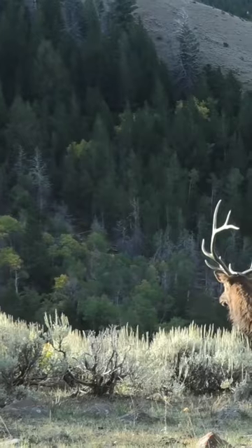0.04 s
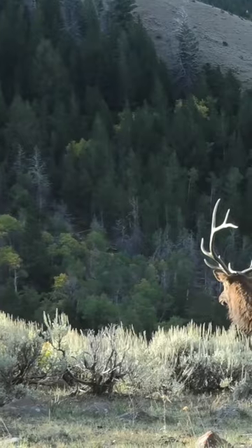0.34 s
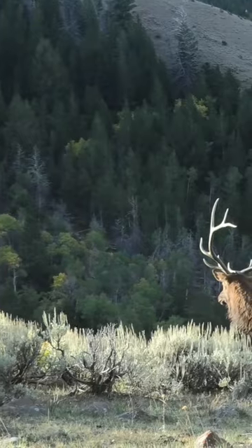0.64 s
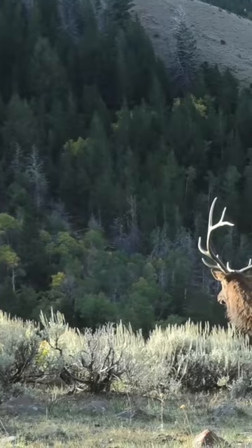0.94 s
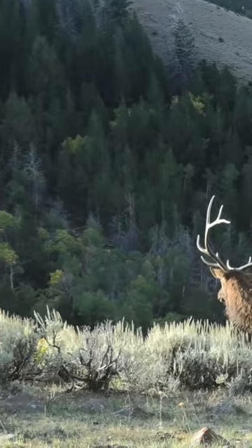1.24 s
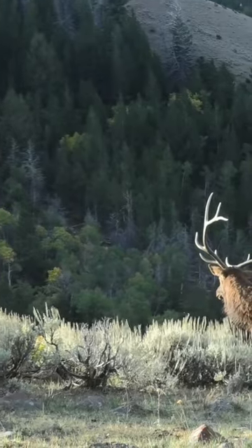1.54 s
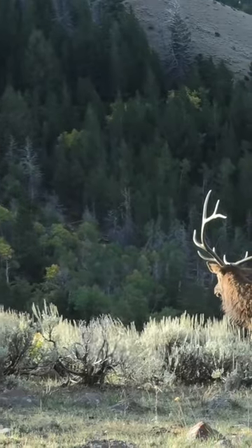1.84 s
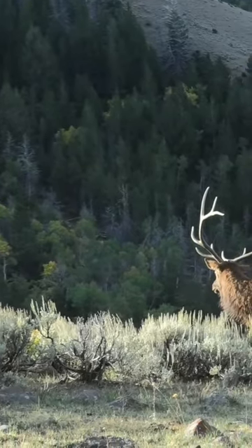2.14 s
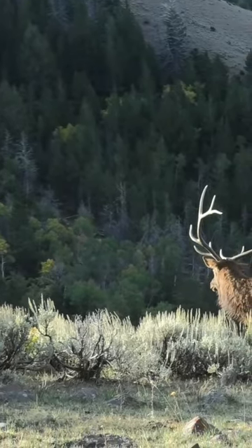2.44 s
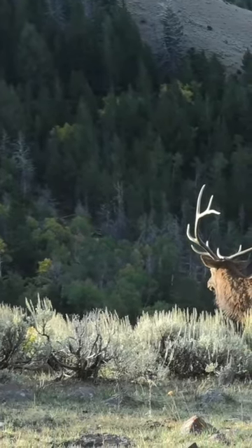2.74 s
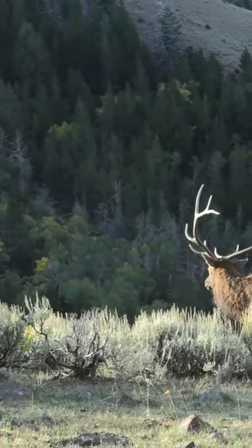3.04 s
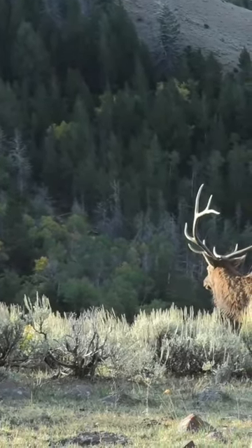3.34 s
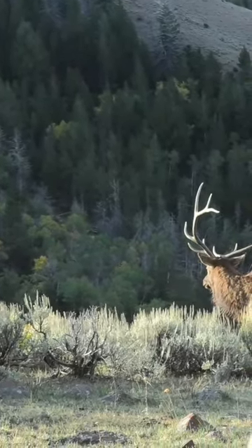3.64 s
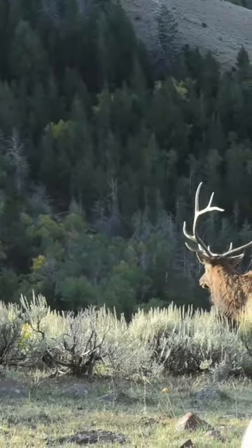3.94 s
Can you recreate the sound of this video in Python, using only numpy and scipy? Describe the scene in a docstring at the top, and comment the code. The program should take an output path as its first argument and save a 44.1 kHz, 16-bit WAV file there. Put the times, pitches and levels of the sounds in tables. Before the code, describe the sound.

Elk bugle across an open hillside, with thin, wavering, distant whistles for the first 2 seconds. At about 2.2 seconds a nearer bull gives a short falling honk. Three louder rising whistles follow at about 2.8, 3.3 and 3.8 seconds, each breaking into a breathy grunt and echoing faintly. Wind rushes softly throughout, with low gusts buffeting the microphone harder from about 2 seconds.

```python
"""Thin bugles of far elk come first. Then a bull elk on an open hillside gives a two-voiced honk
and three rising whistles, nearly pure tones that each break into a grunt of breath in his throat.
The forested slope sends back faint echoes. All along, air rushes over the sagebrush
and gusts buffet the microphone more and more."""
import sys
import numpy as np
from scipy import signal
from scipy.fft import rfft, irfft, next_fast_len
from scipy.io import wavfile
from scipy.ndimage import uniform_filter1d, map_coordinates

SR = 44100
rng = np.random.default_rng(int(sys.argv[2]) if len(sys.argv) > 2 else 0)


def transcribe(signal):
    """Save signal, clipped to [-1, 1], as a 16-bit WAV file at the path in sys.argv[1]."""
    frames = np.atleast_2d(signal).T
    limited = np.clip(frames, -1, 1)
    pcm = np.round(limited * 32767).astype(np.int16)
    wavfile.write(sys.argv[1], SR, pcm)


N = 176400  # 4 seconds


def whistles():
    """A nearly pure tone climbs and swells with effort, then jumps down to a squeak."""
    # one curve per whistle (time [s], pitch [Hz], level [dB], octave overtone against the tone [dB])
    whistle_curves = [
        [(2.7, 1904, -66, -28), (2.745, 2060, -65, -29), (2.778, 2077, -52, -27), (2.802, 2105, -66, -3),
         (2.822, 2129, -49, -19), (2.848, 2155, -48, -13), (2.875, 2170, -43.5, -30), (2.925, 2144, -40, -31.5),
         (2.94, 2190, -50, -15)],
        [(3.26, 1850, -58, -22), (3.288, 1960, -71, -26.5), (3.31, 2070, -50, -39), (3.34, 2085, -44, -46),
         (3.372, 2117, -44, -33), (3.4, 2137, -41, -19.5), (3.427, 2087, -42, -35)],
        [(3.785, 1957, -75, -25), (3.815, 2010, -56, -28), (3.84, 2055, -52.5, -32), (3.875, 2085, -44, -32),
         (3.898, 2107, -41.5, -32), (3.912, 2100, -45, -32)],
    ]
    # third harmonic of each whistle at its loudest (level against the tone [dB])
    third_levels = [-37, -50, -48]
    # squeaks where the voice breaks (time [s], level [dB])
    squeaks = [(2.943, -50.5), (3.432, -43.5), (3.912, -44.5)]
    out = np.zeros(N)
    for rows, third_db in zip(whistle_curves, third_levels):
        hz, db, octave_db = curves(rows)
        level = amp(db + 0.5 * wobble(60)) * gate(rows[0][0], rows[-1][0], fade=0.006)
        phase = phase_of(hz, jitter=0.0021)
        octave = amp(octave_db + 1.6 * wobble(50)) * np.sin(2 * phase)
        third = amp(third_db) * level / level.max() * np.sin(3 * phase)
        out += level * (np.sin(phase) + octave + third)
    squeak_hz, fall_hz_per_s = 1889, 4100
    for peak, db in squeaks:
        hz = squeak_hz - fall_hz_per_s * np.clip(clock() - peak, -0.02, 0.02)
        out += amp(db) * swell(peak, 0.0052, 0.0052) * np.sin(phase_of(hz, jitter=0.0039))
    return np.sqrt(2) * out


def grunts():
    """Each is a rasp with two hoarse tones: one about an octave below the whistle, then a lower one."""
    # one grunt per whistle (peak time [s], rasp level [dB], pulse rate [Hz], tone level [dB])
    grunt_list = [(2.963, -50, 170, -51.5), (3.454, -49.5, 185, -59.5), (3.928, -53, 175, -60)]
    out = np.zeros(N)
    for peak, rasp_db, pulse_hz, tone_db in grunt_list:
        upper = swell(peak - 0.006, 0.027, 0.027) * np.sin(phase_of(hz=1030, jitter=0.023))
        lower = swell(peak + 0.013, 0.027, 0.026) * np.sin(phase_of(hz=610, jitter=0.0474))
        tones = np.sqrt(2) * amp(tone_db) * (upper + amp(-4.5) * lower)
        out += tones + rasp(peak, rasp_db, pulse_hz, rise=0.026, fall=0.025)
    return out


def honk():
    """Two falling voices make a third tone at the sum of their pitches, and end in a dull rasp."""
    # the upper and the lower voice (time [s], pitch [Hz], level [dB])
    high_curve = [(2.143, 1080, -72), (2.162, 1096, -56), (2.188, 1149, -61.5), (2.218, 1076, -50.5),
                  (2.247, 1073, -58), (2.275, 998, -58), (2.297, 964, -46.5), (2.318, 947, -54),
                  (2.36, 930, -61)]
    low_curve = [(2.245, 699, -65), (2.272, 687.5, -48.5), (2.295, 684, -46.5), (2.31, 657, -51),
                 (2.318, 520, -69), (2.34, 523, -49), (2.37, 512, -67)]
    # the closing rasp (peak time [s], level [dB], pulse rate [Hz])
    last_rasp = (2.333, -53.5, 190)
    high, high_phase = voice(high_curve, jitter=0.019)
    low, low_phase = voice(low_curve, jitter=0.012)
    sum_tone = amp(-5) * high * low / low.max() * np.sin(high_phase + low_phase)
    ending = rasp(*last_rasp, rise=0.05, fall=0.05)
    dull_ending = filtered(ending, lambda hz: 1 / (1 + (hz / 1900) ** 10))  # cuts the treble
    return high * np.sin(high_phase) + low * np.sin(low_phase) + sum_tone + dull_ending


def rasp(peak, db, pulse_hz, rise, fall):
    """Breath rushes through the throat in uneven pulses."""
    # how the throat colours the breath (frequency [Hz], gain [dB])
    throat = [(120, -32), (300, 1), (450, -4.5), (600, 3), (800, -5), (1030, 0.5), (1250, -7), (1520, -7),
              (2300, -12), (4000, -36), (9000, -57), (15000, -68)]
    pulses = 1 + np.cos(phase_of(pulse_hz, jitter=0.121))
    breath = pulses * rng.standard_normal(N)
    return amp(db) * swell(peak, rise, fall) * unit(coloured(breath, throat))


def far_elk():
    """Thin wavering whistles step between notes, with a hoarse start and one squeal."""
    # a squeal that breaks downward (time [s], pitch [Hz], level [dB])
    squeal = [(.735, 1964, -73), (.768, 2008, -62.5), (.795, 2004, -65), (.812, 2080, -75),
              (.866, 2190, -62), (.878, 2010, -60), (.889, 1847, -56), (.908, 1793, -57), (.933, 1810, -70)]
    # held notes (start [s], length [s], first pitch [Hz], last pitch [Hz], level [dB], wavering share)
    notes = [(-.01, 0.146, 2613, 2660, -64, .8), (0.117, 0.17, 2625, 2580, -68.5, 0.84),
             (0.207, 0.1, 2662, 2740, -67, 0.95), (0, 0.36, 2310, 2270, -73.5, 1.04),
             (0.301, 0.42, 2298, 2350, -73, 0.7), (.327, 0.5, 2460, 2520, -77, 0.5),
             (.7, 0.21, 2520, 2675, -74.5, 0.5), (0.775, 0.42, 2310, 2272, -71.5, 0.7),
             (1.102, 0.18, 2085, 2080, -68.5, 0.44), (1.267, .18, 2076, 2084, -68, 0.55),
             (1.277, .17, 2280, 2320, -70, .7), (1.419, 0.19, 2300, 2350, -70, 0.6),
             (1.463, 0.19, 2625, 2620, -73.5, 0.6), (1.662, 0.23, 2610, 2630, -78, 0.5)]
    # hoarse breath in the first bugle (start [s], end [s], level [dB])
    hoarseness = (0, .32, -67)
    # colour of that breath (frequency [Hz], gain [dB])
    far_throat = [(1500, -34), (2200, -6), (2600, -5.5), (2780, -6), (3200, -44), (6000, -70)]
    waver_rate, fade_s = 55, 0.021
    level, phase = voice(squeal, jitter=0.005)
    out = level * wavering(np.sin(phase), waver_rate, share=0.21)
    for start, length, first_hz, last_hz, db, share in notes:
        hz = np.interp(clock(), [start, start + length], [first_hz, last_hz])
        tone = wavering(np.sin(phase_of(hz, jitter=0.006)), waver_rate, share)
        out += np.sqrt(2) * amp(db) * gate(start, start + length, fade_s) * tone
    start, end, db = hoarseness
    breath = unit(coloured(rng.standard_normal(N), far_throat))
    return out + amp(db) * gate(start, end, fade_s) * breath


def echoes(x):
    """The tree line and the far slope send back separate echoes that flutter differently at each ear."""
    # one row per echo (delay [s], level [dB], bass cut below [Hz])
    returns = [(.075, -22, 200), (.122, -19.5, 200), (.19, -19.5, 200), (.835, -13, 1500)]
    air_loss_db_per_s, flutter_rate = 21, 50  # the loss is for a 4000 Hz tone
    out = np.zeros((2, N))
    for delay, db, cut_hz in returns:
        def path(hz):
            late = np.exp(-2j * np.pi * hz * delay)
            treble_loss = amp(-air_loss_db_per_s * delay * (hz / 4000) ** 2)
            bass_cut = 1 - 1 / (1 + (hz / cut_hz) ** 4)
            return late * treble_loss * bass_cut
        echo = filtered(x, path)
        out += amp(db) * np.array([wavering(echo, flutter_rate, share=0.95) for ear in range(2)])
    return out * unit(amp(4 * wobble(flutter_rate)))


def scatter(x):
    """Brush and trees scatter the sound into a soft tail; the treble dies first."""
    # how long the slope rings (frequency [Hz], time to fade by 60 dB [s])
    fade_times = [(200, 1), (2000, 0.99), (8000, 0.11)]
    hz, t, noise = signal.stft(rng.standard_normal((2, SR)), SR, nperseg=256)
    decay = amp(-60 * t / along(fade_times, hz)[:, None])
    tail = signal.istft(noise * decay, SR, nperseg=256)[1]
    return signal.fftconvolve(x[None], tail / np.linalg.norm(tail[0]), axes=1)[:, :N]


def wavering(x, rate, share):
    """Paths through moving air add and cancel; share is the unsteady part of the power, capped at 1."""
    share = np.clip(share, 0, 1)
    fading = np.sqrt(1 - share) + np.sqrt(share / 2) * (wobble(rate) + 1j * wobble(rate))
    return np.real(signal.hilbert(x) * fading)


def gusts():
    """Wind thumps on the microphone, and small swirls flutter in the sharper gusts."""
    # strength of the gusts (time [s], level [dB])
    gust_curve = [(0, -52.5), (.1, -53.5), (.3, -61), (.7, -59.5), (.84, -54), (1.05, -60), (1.37, -46.5),
                  (1.78, -58.5), (1.9, -38.5), (2.1, -41.5), (2.3, -45.5), (2.56, -48), (2.66, -40),
                  (2.81, -38.5), (2.92, -42), (3.14, -38), (3.19, -34), (3.42, -42.5), (3.88, -36.5),
                  (4, -46)]
    # swirls of air (peak time [s], half-length [s], level [dB])
    swirls = [(1.386, .046, -68), (2, 0.031, -58.5), (2.207, 0.03, -60), (2.665, 0.041, -50),
              (3.234, 0.056, -50.5), (3.7, 0.43, -60.5)]
    # colours of the gusts and the swirls (frequency [Hz], gain [dB])
    gust_colour = [(8, 3), (20, 2), (32, 1), (50, -8.5), (80, -12), (130, -22), (200, -33), (400, -45),
                   (1000, -82)]
    swirl_colour = [(30, -12), (80, -2.5), (130, -3.5), (200, -11.5), (350, -23.5), (900, -72)]
    gust_level = amp(curves(gust_curve)[0] + 1.3 * wobble(16))
    swirl_level = sum(amp(db) * swell(peak, half, half) for peak, half, db in swirls)
    rumble = gust_level * rush(gust_colour, alike=-0.55, pan_db=-4.5, patchy_db=1.8)
    return rumble + swirl_level * rush(swirl_colour, alike=-0.72, pan_db=-4, patchy_db=3)


def breeze():
    """Air rushes over the sagebrush, with a fine hiss on top."""
    # rise and fall of the rushing air and of its hiss (time [s], level [dB])
    air_curve = [(0, -62), (.6, -63), (1.5, -63), (2.1, -62.5), (2.7, -61.5), (3.2, -60), (3.6, -57.5),
                 (4, -56)]
    hiss_curve = [(0, -74.5), (.6, -76.5), (1.2, -78.5), (2.2, -78), (3.1, -78.5), (3.29, -81.5),
                  (3.42, -76.5), (3.7, -74.5), (4, -71.5)]
    # their colours (frequency [Hz], gain [dB])
    air_colour = [(30, -11), (120, -2.5), (300, 0), (700, 0), (1150, 0), (1600, -4), (2300, -9),
                  (3000, -15.5), (4500, -25.5), (8000, -42)]
    hiss_colour = [(1000, -39), (3000, 2), (5300, 1.5), (6600, -3), (7800, -3), (10000, -9.5),
                   (13500, -13.5), (15000, -25)]
    air_level = amp(0.5 + curves(air_curve)[0] + 0.69 * wobble(9.4))
    hiss_level = amp(0.96 + curves(hiss_curve)[0])
    air = air_level * rush(air_colour, alike=0.63, pan_db=-5.5, patchy_db=1.27)
    return air + hiss_level * rush(hiss_colour, alike=0.041, pan_db=-1.4, patchy_db=1.43)


def rush(colour, alike, pan_db, patchy_db):
    """Stereo noise with louder and softer patches; alike is 1 for equal ears, -1 for opposite ones."""
    noise = signal.stft(rng.standard_normal((2, N)), nperseg=512)[2]
    patches = uniform_filter1d(rng.standard_normal(noise.shape[1:]), 5, axis=0)  # smooth over frequency
    patches = uniform_filter1d(patches, 14, axis=1)  # and over time
    pair = signal.istft(noise * amp(patchy_db * unit(patches)), nperseg=512)[1][:, :N]
    middle, side = coloured(pair, colour)
    width = np.arccos(alike) / 2
    ears = panned(np.cos(width) * middle + np.sin(width) * np.array([side, -side]), pan_db)
    return ears / ears.mean(0).std()


def voice(rows, jitter):
    """Loudness and phase of a voice that follows a pitch and level curve."""
    hz, db = curves(rows)
    return np.sqrt(2) * amp(db) * gate(rows[0][0], rows[-1][0], fade=0.0047), phase_of(hz, jitter)


def phase_of(hz, jitter):
    """Phase of a tone whose pitch wanders by about the fraction jitter."""
    return 2 * np.pi * np.cumsum(hz * (1 + jitter * wobble(140))) / SR


def swell(peak, rise, fall):
    """A smooth rise and fall around a peak, all in seconds."""
    t = clock() - peak
    return np.exp(-(t / np.where(t < 0, rise, fall)) ** 2)


def gate(start, end, fade):
    """1 from start to end, with soft edges, all in seconds."""
    inside = np.minimum(clock() - start, end - clock())
    return np.sin(np.pi / 2 * np.clip(inside / fade, 0, 1)) ** 2


def wobble(rate):
    """A smooth curve through rate random values a second."""
    return map_coordinates(rng.standard_normal(int(N * rate / SR) + 4), [clock() * rate])


def curves(rows):
    """One value per sample for each column after the time."""
    times, *columns = np.transpose(rows)
    return [np.interp(clock(), times, column) for column in columns]


def along(points, hz):
    """Read between a table's (frequency [Hz], value) points, with octaves evenly spaced."""
    frequencies, values = np.transpose(points)
    return np.interp(np.log(hz + 1), np.log(frequencies + 1), values)


def filtered(x, response):
    """Multiply each frequency in x by response(hz)."""
    size = next_fast_len(N + SR // 2)
    return irfft(rfft(x, size) * response(np.fft.rfftfreq(size, 1 / SR)), size)[..., :N]


def coloured(x, colour):
    """Filter x by a table of (frequency [Hz], gain [dB])."""
    return filtered(x, lambda hz: amp(along(colour, hz)))


def panned(x, pan_db):
    """Lean a sound left (+) or right (-), keeping its middle level."""
    gains = amp(np.array([[0.5], [-0.5]]) * pan_db)
    return x * gains / gains.mean(0)


def amp(db):
    """Decibels to gain."""
    return 10 ** (np.asarray(db) / 20)


def unit(x):
    """Scale to an average power of 1."""
    return x / np.sqrt(np.mean(x ** 2) + 1e-20)


def clock():
    """Seconds at each sample."""
    return np.arange(N) / SR


def scene():
    """The elk stand to the right, in the wind; the bull calls toward the slope."""
    # colour of what the hillside sends back (frequency [Hz], gain [dB])
    hillside = [(520, 6), (700, 0.5), (1000, 3.5), (2200, 0.5), (4200, 12), (8000, -3)]
    # how far the calls lean to one side (frequency [Hz], left minus right [dB])
    lean = [(400, -9), (1000, -15), (2100, -5), (4300, -2.5), (8000, -10)]
    bull = whistles() + honk() + grunts()
    reflected = coloured(bull, hillside)
    far = far_elk()
    calls = bull + echoes(reflected) + amp(-18) * scatter(reflected)
    calls += far + amp(-9) * scatter(far)
    return filtered(calls, lambda hz: panned(0.8, along(lean, hz))) + gusts() + breeze()


def record(dry):
    """The very highest treble is cut off."""
    return filtered(dry, lambda hz: hz < 14970)


dry = scene()
out = record(dry)
transcribe(out)
```